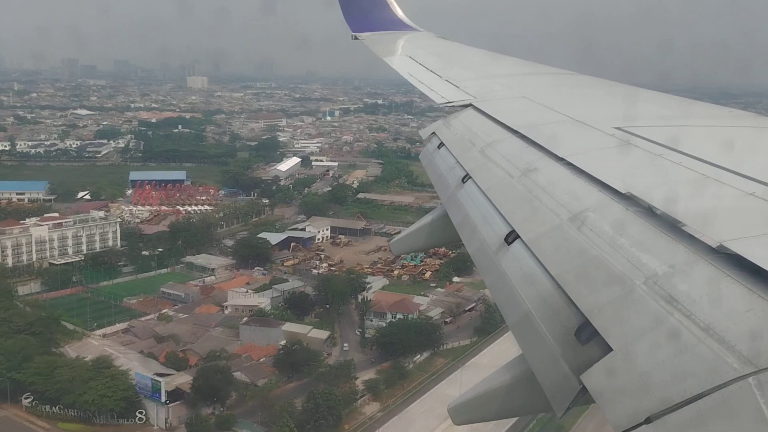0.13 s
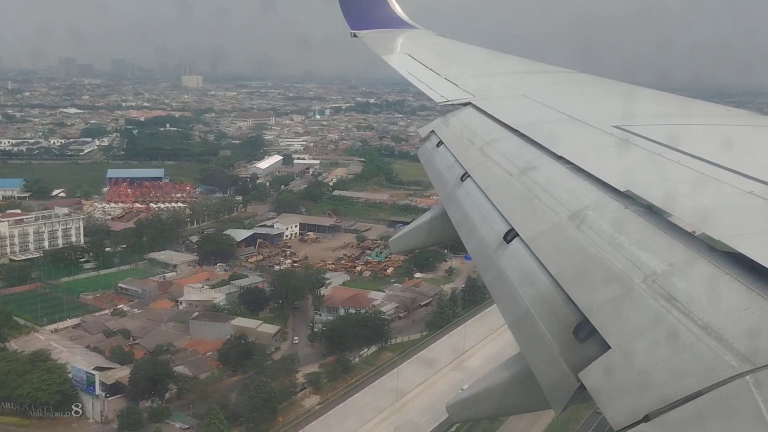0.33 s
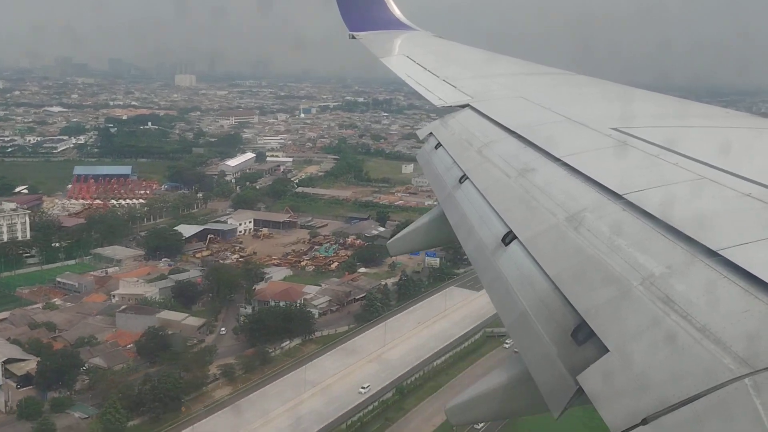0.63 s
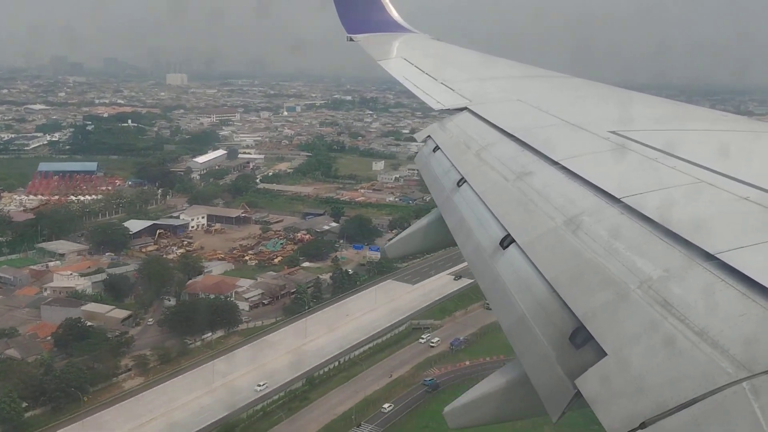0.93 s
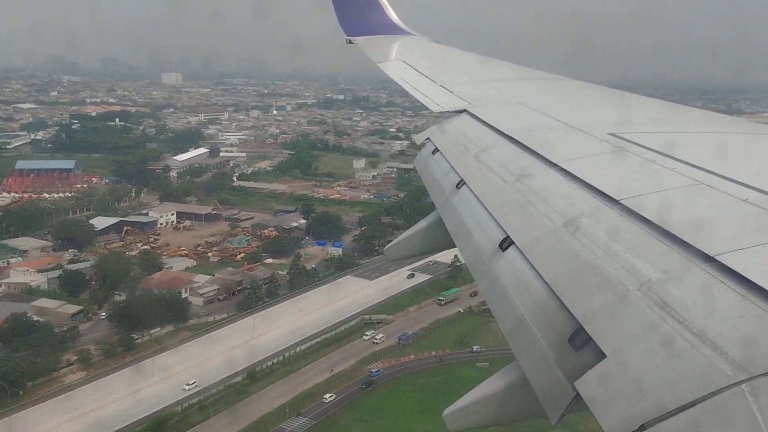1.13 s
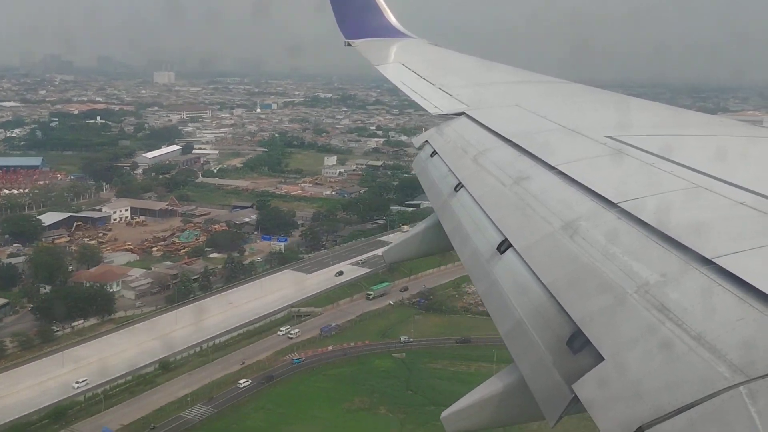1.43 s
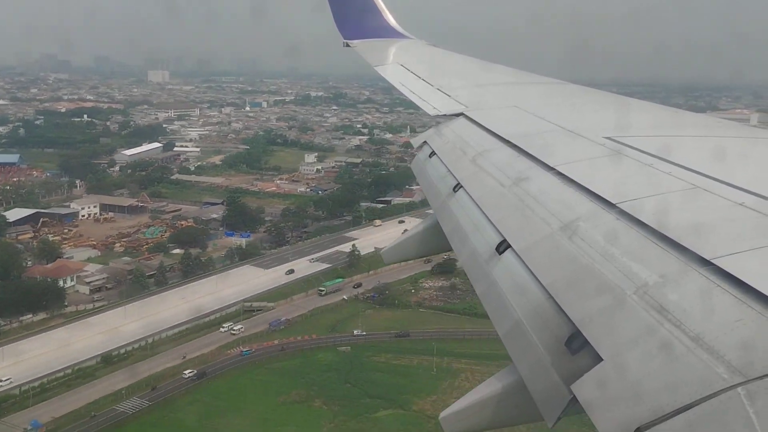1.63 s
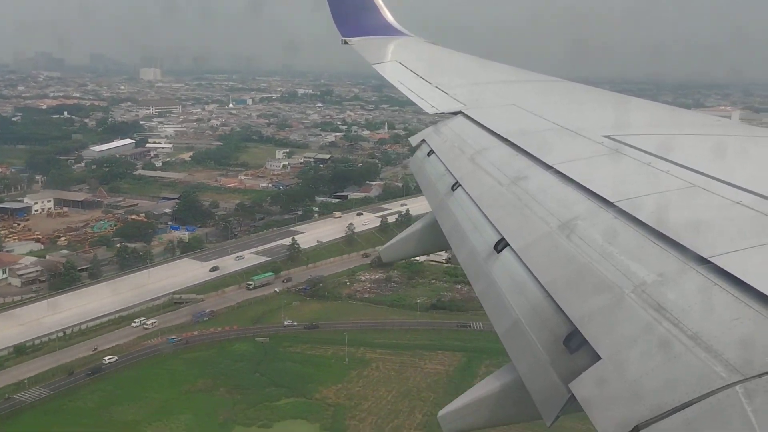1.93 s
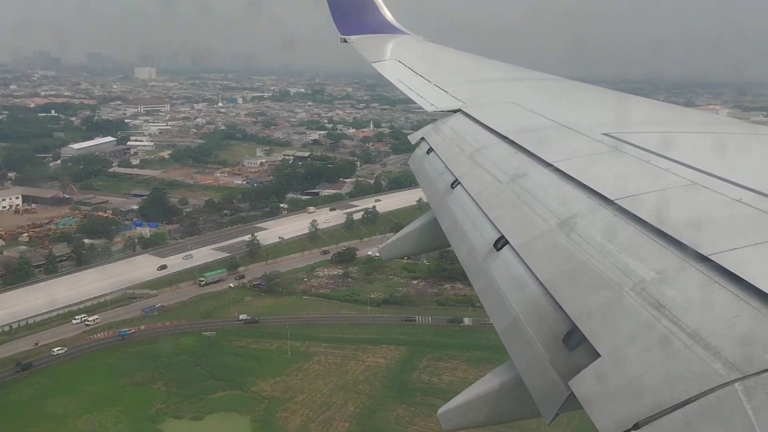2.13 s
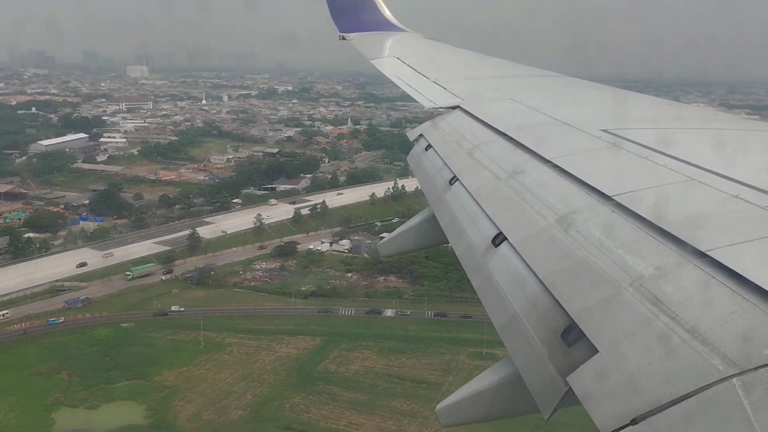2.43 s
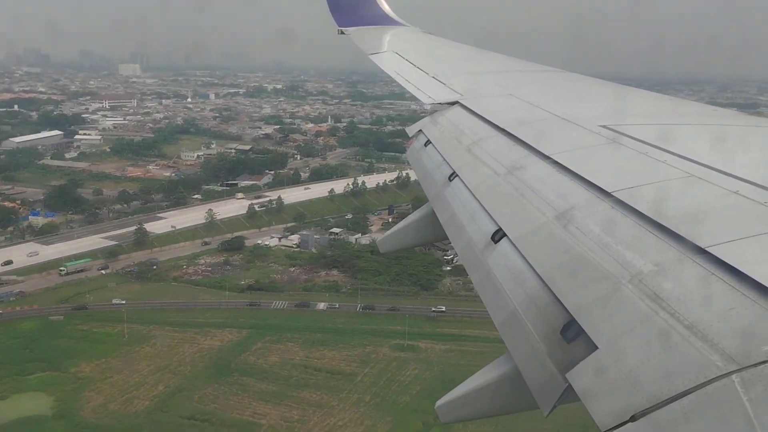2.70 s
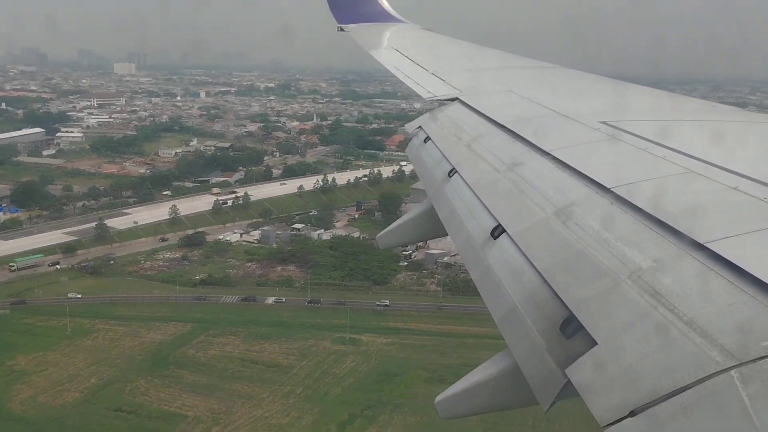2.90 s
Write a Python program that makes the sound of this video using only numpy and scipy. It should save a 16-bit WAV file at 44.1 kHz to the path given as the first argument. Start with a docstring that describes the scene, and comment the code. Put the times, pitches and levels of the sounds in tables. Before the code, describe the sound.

Continuous low roar of jet engines and airflow inside an airliner cabin, bass gently heaving, with soft hiss, a faint wavering fan whine, and small rustles and ticks close to a stereo microphone at the window.

```python
"""Airliner cabin on the descent

Two-channel listening point at a window over the wing. Engine and airflow roar, cabin hiss, wall rush
and a duller gush are coloured noise; wavering sines make the deep booms and the thin whine of the fans.
Close by, something is handled: grains ring as faint rustles, decaying noise as small ticks."""
import sys
import numpy as np
from scipy import signal
from scipy.fft import rfft, irfft, next_fast_len
from scipy.io import wavfile
from scipy.ndimage import uniform_filter1d, minimum_filter1d, map_coordinates

SR = 44100
rng = np.random.default_rng(int(sys.argv[2]) if len(sys.argv) > 2 else 0)


def digitize_waveform(pressure):
    """Quantize a signal to 16-bit integers and store it at the path in sys.argv[1].

    Rows of a 2-D input are taken as channels; values are limited to [-1, 1].
    """
    field = np.atleast_2d(pressure).T
    bounded = np.clip(field, -1, 1)
    quanta = np.round(bounded * 32767).astype(np.int16)
    wavfile.write(sys.argv[1], SR, quanta)


N = 134946
TIME_S = np.arange(N) / SR
TOP_HZ = 15700  # top of the sound, also the highest pitch of a ring


def undb(db):
    """Decibels to gain."""
    return 10 ** (np.asarray(db) / 20)


def unit(x):
    """Scale to rms 1."""
    return x / np.sqrt(np.mean(x ** 2))


def pan(db):
    """Left and right gains for a left minus right level difference, half of it on each side."""
    return undb(np.array([[db], [-db]]) / 2)


def smooth_twice(x, size):
    """Two running means over the same number of samples."""
    return uniform_filter1d(uniform_filter1d(x, size), size)


def walk(rate):
    """Random levels held 1 / rate s and slewed twice; spread 1."""
    hold = int(SR / rate)
    steps = np.repeat(rng.standard_normal(N // hold + 2), hold)
    return unit(smooth_twice(steps, hold)[:N])


def level_curve(points):
    """Gain through (time [s], level [dB]) points."""
    seconds, db = np.array(points).T
    return undb(np.interp(TIME_S, seconds, db))


def colour(x, points, tilt_db=0):
    """Filter by a (frequency [Hz], density [dB per Hz]) curve and a tilt in dB per octave; rms 1."""
    hz, db = np.array(points).T
    size = next_fast_len(N)
    octave = np.log2(np.maximum(np.arange(size // 2 + 1) * SR / size, 1))
    curve = np.interp(octave, np.log2(hz), db) + tilt_db * octave
    # beyond the last point the curve falls a further 24 dB per octave
    curve = curve - 24 * np.maximum(octave - np.log2(hz[-1]), 0)
    return unit(irfft(rfft(x, size) * undb(curve), size)[..., :N])


def late(x, seconds):
    """Delay a sound."""
    return map_coordinates(x, [np.arange(N) - seconds * SR], mode="mirror")


def tone(hz):
    """A sine of rms 1 that follows a pitch curve."""
    cycles = np.cumsum(hz) / SR
    return np.sqrt(2) * np.sin(2 * np.pi * (cycles + rng.random()))


def zero_phase(x, order, edges_hz, kind):
    """Filter a band forwards and backwards, so that it stays in step with the whole."""
    sos = signal.butter(order, edges_hz, kind, fs=SR, output="sos")
    return signal.sosfiltfilt(sos, x, padtype="even")


def roar():
    """Low turbulent noise, nearly alike at both ears; its deepest part heaves, its low middle surges."""
    # roar through the fuselage: (frequency [Hz], density [dB per Hz])
    spectrum = [(15, -8.5), (32, -12.5), (43, 1.5), (64, 1.5), (77, -2.5), (105, -0.06), (160, -0.6),
                (195, -3), (235, -1), (290, -8), (330, -7), (375, -13.5), (510, -18.5), (640, -25),
                (760, -36.5), (1200, -52)]
    # level of the deepest rumble: (time [s], level [dB])
    deep_level = [(0, 7), (.3, -1.5), (.55, -0.5), (.72, -8), (.95, -2.5), (1.35, -1.5), (1.8, 3),
                  (2.08, 0.5), (2.27, -0.5), (2.5, -4.5), (2.85, 2.5), (3.06, -4)]
    # level of the low middle of the roar: (time [s], level [dB])
    body_level = [(0, -1), (.07, 1.5), (.15, 0), (.43, 1), (.7, 0), (.83, 2.5), (.93, 0.5), (1.05, 1.5),
                  (1.16, -2), (1.27, 3), (1.4, -4), (1.55, 2), (1.92, -1), (2.04, 2), (2.24, -3),
                  (2.34, 0.5), (2.5, -1), (2.9, 0.5), (3.06, -2.5)]
    steady = 0.7  # share of the low middle's chance swells that is evened out
    noise = colour(rng.standard_normal(N), spectrum) * undb(-13)
    deep = zero_phase(noise, 4, 75, "lowpass")
    body = zero_phase(noise, 4, [181, 420], "bandpass")
    chance_swells = unit(np.sqrt(smooth_twice(body ** 2, 4000)))
    deep_change = deep * (level_curve(deep_level) - 1)
    body_change = body * (level_curve(body_level) / chance_swells ** steady - 1)
    shaped = noise + deep_change + body_change
    return np.array([late(shaped, seconds=0.00017), shaped])


def booms():
    """Brief bell-shaped swells of a deep drone of the airframe, unsteady in pitch."""
    # deep swells: (time of the peak [s], length [s], level at the peak [dB], pitch [Hz])
    swells = [(0.722, 0.096, -16.5, 63.6), (1.843, 0.2, -21, 52.9), (2.253, 0.11, -13, 46.83)]
    wander_hz = 2.77
    out = 0
    for at, length, db, hz in swells:
        swell = np.exp(-2 * ((TIME_S - at) / length) ** 2)
        out = out + tone(hz + wander_hz * walk(16)) * swell * undb(db)
    return out


def cabin():
    """Roar and ventilation hiss scattered round the cabin: independent noise at each ear."""
    # diffuse cabin noise: (frequency [Hz], density [dB per Hz])
    spectrum = [(30, -12), (120, 5), (260, -1), (480, -7), (700, -12.5), (1000, -12.5), (1500, -24),
                (2200, -25.5), (3000, -32.5), (4000, -36), (5200, -42), (7000, -44.5), (8800, -41),
                (10500, -47), (12500, -58.5), (15500, -64)]
    return colour(rng.standard_normal((2, N)), spectrum) * undb(-28.5)


def gush():
    """Dull airflow noise from the cabin side, louder at the left ear but reaching it later."""
    # dull airflow: (frequency [Hz], density [dB per Hz])
    spectrum = [(150, -16.5), (300, 3.5), (480, 1), (600, -6.5), (740, -3), (1100, -29.5)]
    noise = colour(rng.standard_normal(N), spectrum) * undb(-38)
    return np.array([late(noise, seconds=0.00077), noise]) * pan(8.5)


def rush():
    """Airflow noise along the wall, much louder and earlier on the right."""
    # air rushing along the wall: (frequency [Hz], density [dB per Hz])
    spectrum = [(500, -13.5), (720, -2.5), (950, 2.5), (1220, -3), (1450, -2.5), (2000, -13), (2600, -21),
                (3800, -21), (5200, -39), (9000, -53.5)]
    near = colour(rng.standard_normal(N), spectrum) * undb(-36.5)
    far = late(near, seconds=0.00039) * undb(-12)
    return np.array([far, near])


def ring(x, pitch):
    """Add the short resonances of the handled thing, shifted by a pitch ratio."""
    # resonances before the shift: (frequency [Hz], width [Hz], level [dB])
    resonances = [(3900, 140, 12.5), (4790, 130, 9), (6260, 220, 7.5), (7500, 270, 5), (8660, 580, 9)]
    out = x
    for hz, width, db in resonances:
        b, a = signal.iirpeak(min(hz * pitch, TOP_HZ), hz / width, fs=SR)
        out = out + signal.lfilter(b, a, x) * undb(db)
    return out


def rustles():
    """Short rubs: dense tiny slips that grow to a peak, fade, and ring at a pitch set by the grip."""
    # rubs: (time of the peak [s], rise and fall [s], level at the peak [dB],
    # brightness [dB per octave], pitch of the rings [ratio])
    rubs = [(.16, .04, -59, 0, 1), (1.215, 0.013, -45, 4, .99), (1.25, .07, -61.5, 3.5, 0.95),
            (1.437, .017, -54, 1, 1), (2.017, .06, -56, 4.5, 1.08), (2.125, 0.014, -59, 4, 1.05),
            (2.248, 0.028, -53, 6, 1.06), (2.53, 0.016, -42, -4.5, 0.94), (2.795, 0.022, -58, 5, 1.05),
            (2.96, 0.06, -60, 2, 1.04)]
    # colour of a rub before its brightness: (frequency [Hz], density [dB per Hz])
    spectrum = [(1500, -20), (3000, -4.5), (4000, -1.5), (5200, -9.5), (6800, -11.5), (8500, -6.5),
                (10000, -10), (12000, -18), (15500, -29)]
    grains_per_s, spread_db, crinkle_db = 9000, -1, -1.5
    spread = np.minimum(rng.exponential(size=(2, N)), 4)
    size = rng.standard_normal((2, N)) * undb(spread_db * spread)
    slips = rng.random((2, N)) < grains_per_s / SR
    grains = slips * size * undb(crinkle_db * walk(300))
    out = 0
    for at, length, db, bright, pitch in rubs:
        shape = np.exp(-np.abs(TIME_S - at) / length)
        rub = unit(colour(ring(grains, pitch), spectrum, bright) * shape)
        # the rms of the shape makes the level that of the peak
        out = out + rub * np.sqrt(np.mean(shape ** 2)) * undb(db)
    return out


def ticks():
    """Tiny dry contacts: ringing noise that starts at once and decays within milliseconds."""
    # contacts: (time [s], level at the start before panning [dB], left minus right [dB], decay [s],
    # brightness [dB per octave], pitch of the rings [ratio])
    contacts = [(.0955, -38.5, -10, 0.00054, 3, 1.06), (2.214, -46, -4, .005, 7, 1.04),
                (2.246, -47, -5, 0.0036, 3, 1.06), (2.256, -50, -2, .003, 4, 1.06),
                (2.272, -48, 0, .003, 4, 0.83), (2.809, -41, -6, .004, -3, 1.0),
                (2.924, -50, -4, .003, 3, 1.1), (2.953, -47, -5, .002, -4, 1.1)]
    # colour of a contact before its brightness: (frequency [Hz], density [dB per Hz])
    spectrum = [(1500, -12), (4000, 3), (6000, 1), (9000, -2.5), (11000, -7), (15500, -15)]
    crack = rng.standard_normal((2, N))
    out = 0
    for at, db, side, decay, bright, pitch in contacts:
        shape = (TIME_S >= at) * np.exp(-np.abs(TIME_S - at) / decay)
        out = out + colour(ring(crack, pitch), spectrum, bright) * shape * undb(db) * pan(side)
    return out


def whines():
    """Fan tones: sines that waver in pitch, flutter in level and swell together."""
    # mean pitch of each fan tone: [Hz]
    pitches = [877, 957, 1443, 1484, 3698, 4127, 8510]
    # each tone before flutter, panning and swell: (level [dB], pitch wander [Hz], left minus right [dB])
    voices = [(-52.5, 2.5, -2), (-59.5, 9, -8), (-54, 4.5, -11), (-66, 9, -4), (-83, 13, -3.5),
              (-77.5, 5.6, 6), (-83, 25, 4.5)]
    # the whine comes and goes: (time [s], level [dB])
    swell = [(0, -1), (.15, 1), (.35, -4), (.75, -2), (1.0, 2), (1.27, -1.5), (1.49, 3), (1.63, 2.5),
             (1.8, -1), (2.03, 2.5), (2.25, -2.5), (2.36, 2), (2.55, -1.5), (3.0, 1.5)]
    flutter_db = 1.4
    tones = 0
    for hz, (db, wander, side) in zip(pitches, voices):
        wavering = tone(hz + wander * walk(40))
        tones = tones + wavering * undb(db + flutter_db * walk(45)) * pan(side)
    return tones * level_curve(swell)


def scene():
    """The cabin sound, its airflow stirred by quick turbulence, with the small noises close by."""
    turbulence = undb(1.0 * walk(75))  # spread 1 dB
    air = (cabin() + gush() + rush()) * turbulence
    return roar() + booms() + air + rustles() + ticks() + whines()


def record(dry):
    """A smooth limiter holds down the highest peaks of the bass in both channels; the top is cut."""
    bass_hz, ceiling, knee = 517, 0.53, 2.7  # ceiling in full scale; a higher knee bends more sharply
    size = 441  # samples, 10 ms
    bass = signal.sosfiltfilt(signal.butter(2, bass_hz, fs=SR, output="sos"), dry)
    peak = np.abs(bass).max(axis=0)
    gain = (1 + (peak / ceiling) ** (2 * knee)) ** (-0.5 / knee)
    gain = smooth_twice(minimum_filter1d(gain, 2 * size), size)
    limited = dry + bass * (gain - 1)
    top_cut = signal.ellip(8, 0.2, 70, TOP_HZ, fs=SR, output="sos")
    return signal.sosfilt(top_cut, limited)


dry = scene()
out = record(dry)
digitize_waveform(out)
```